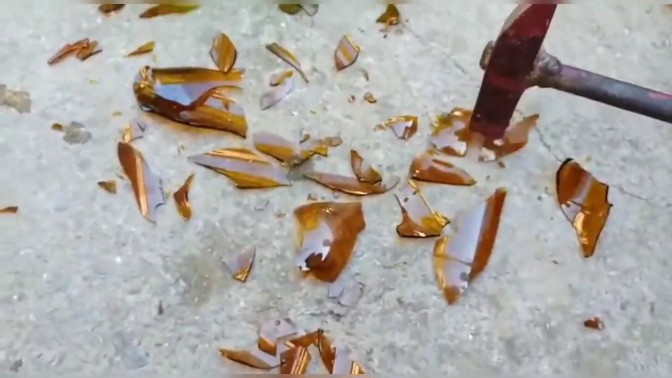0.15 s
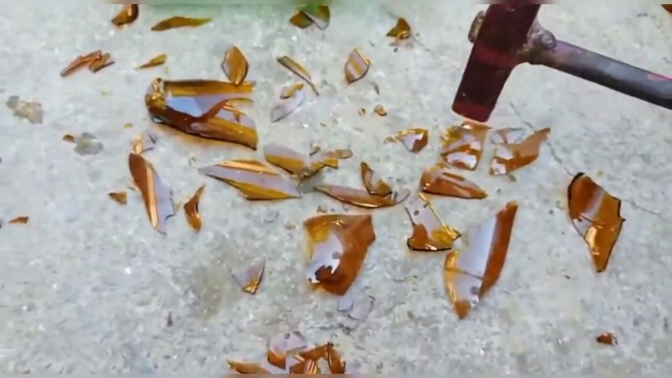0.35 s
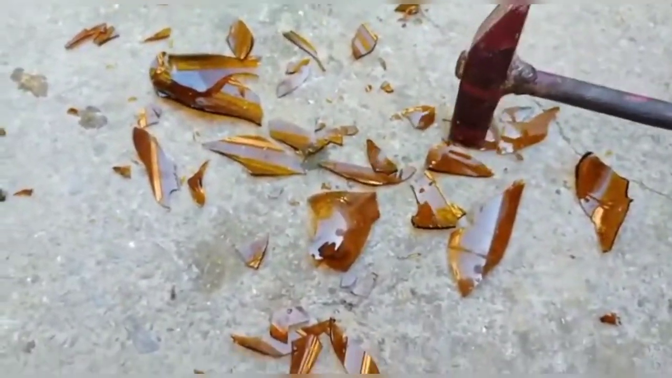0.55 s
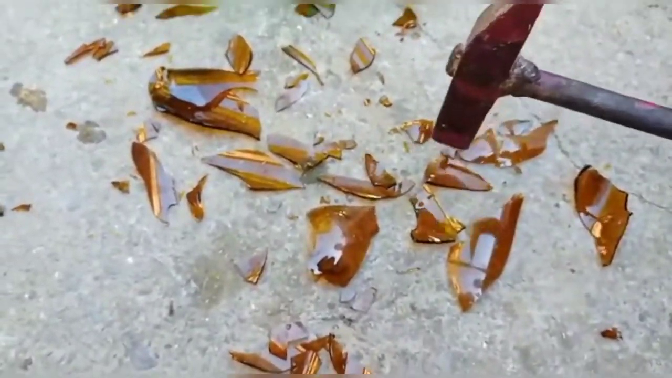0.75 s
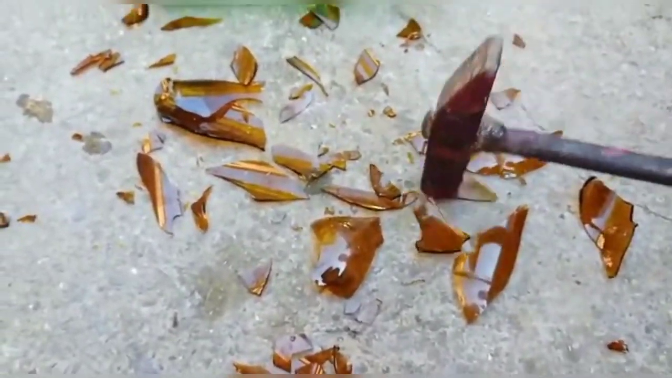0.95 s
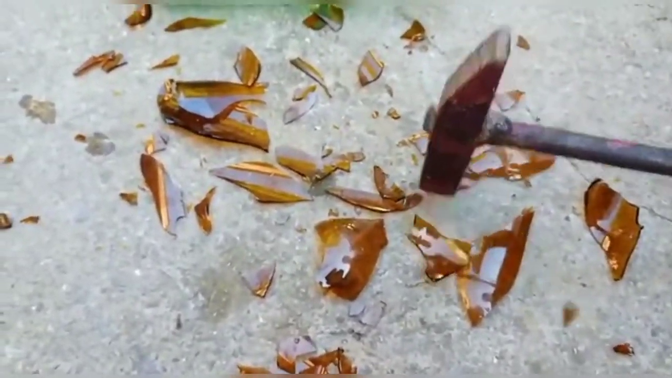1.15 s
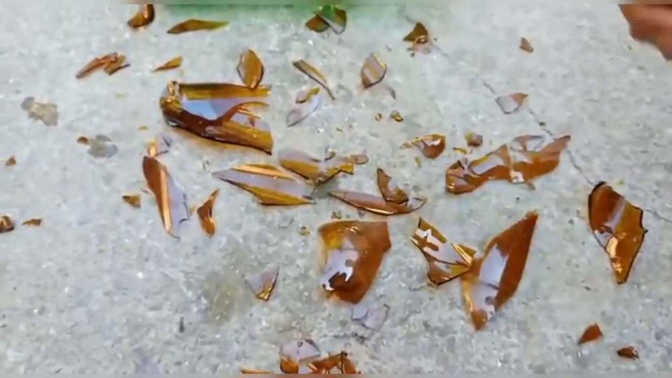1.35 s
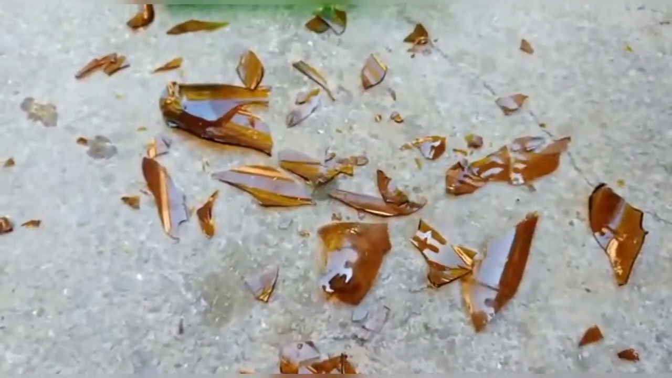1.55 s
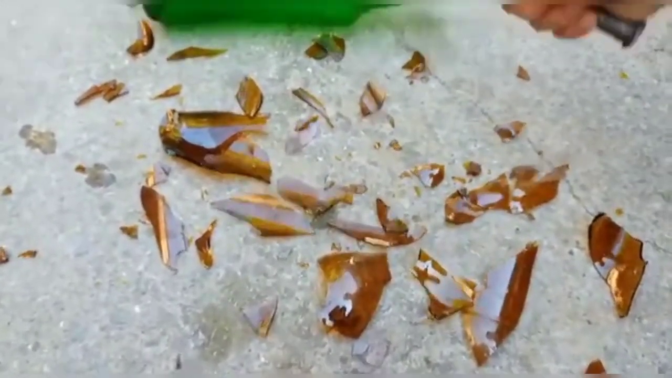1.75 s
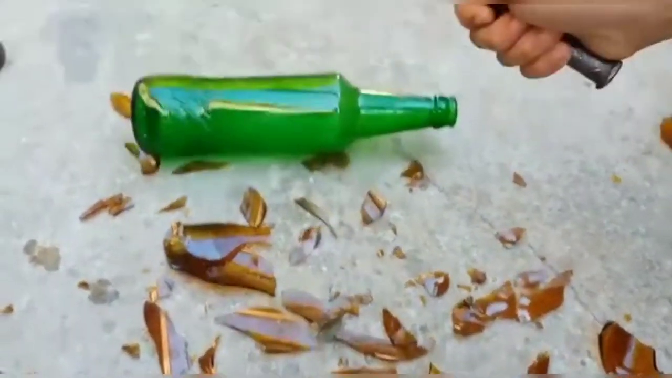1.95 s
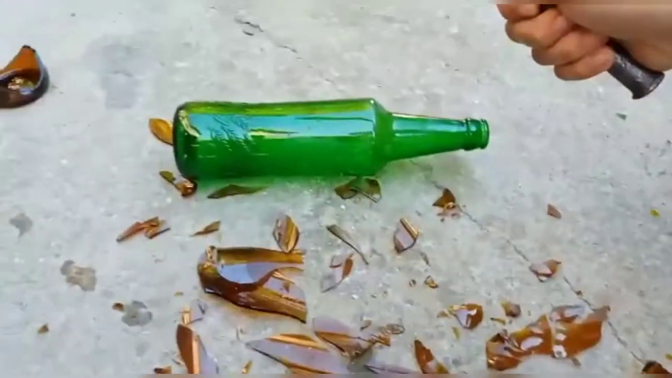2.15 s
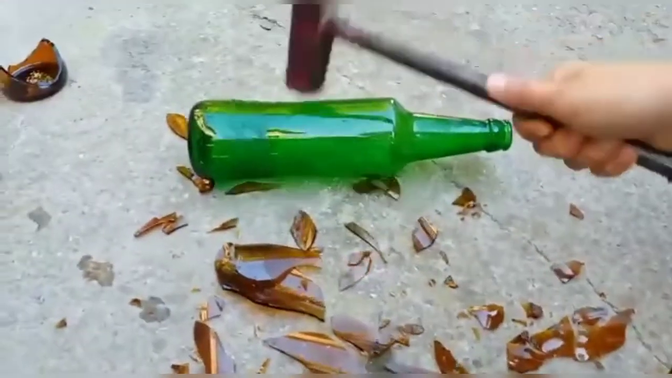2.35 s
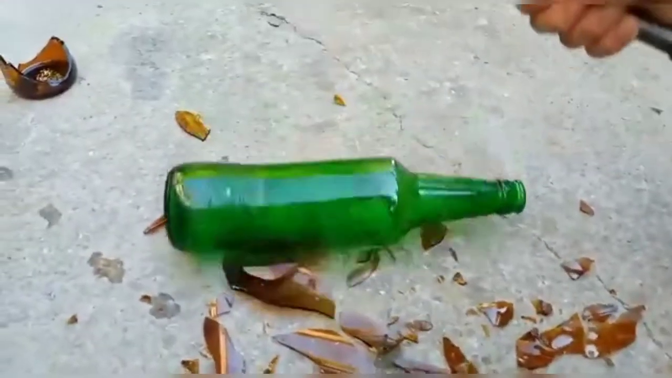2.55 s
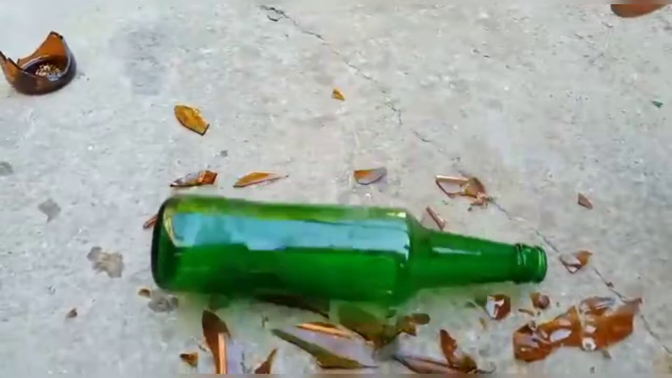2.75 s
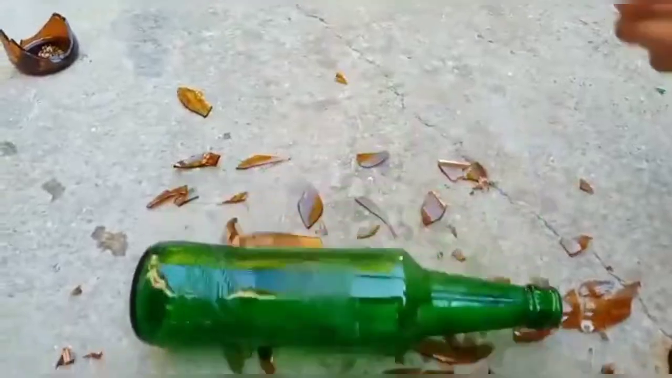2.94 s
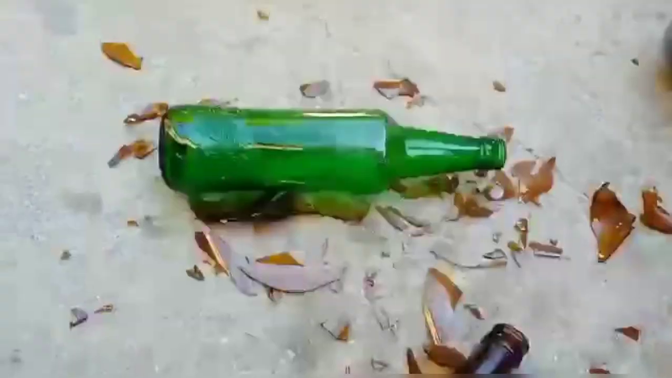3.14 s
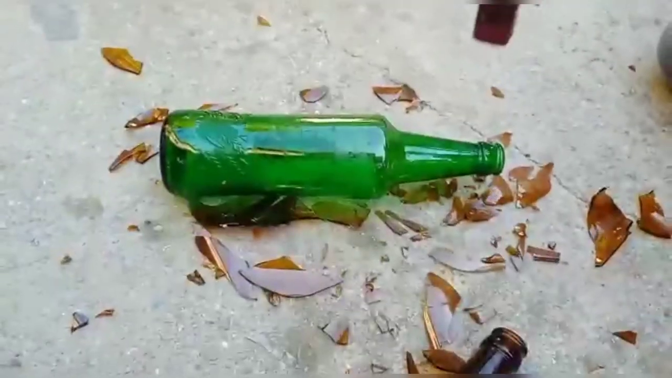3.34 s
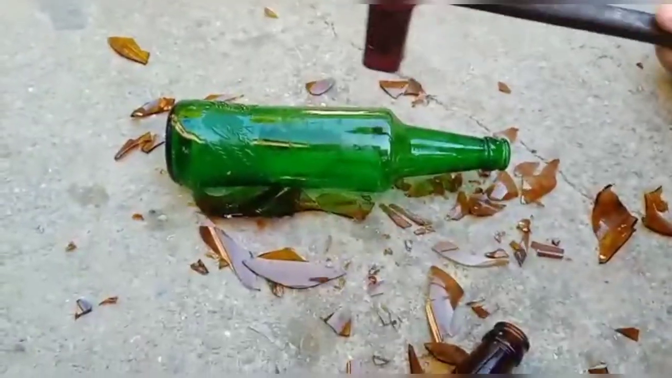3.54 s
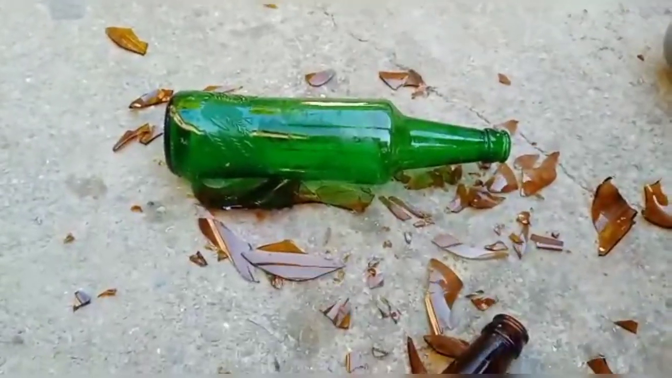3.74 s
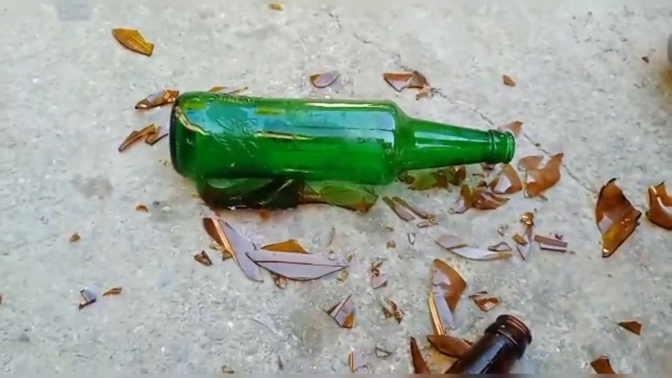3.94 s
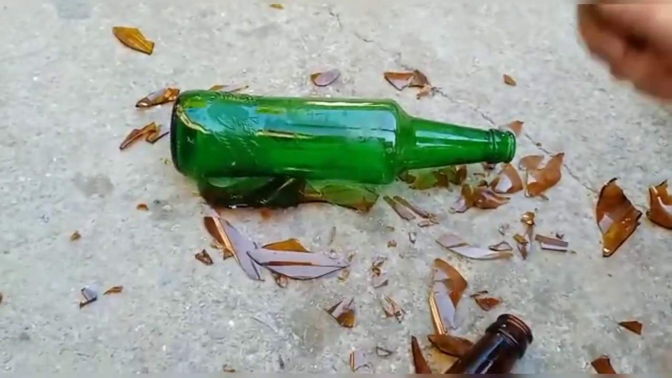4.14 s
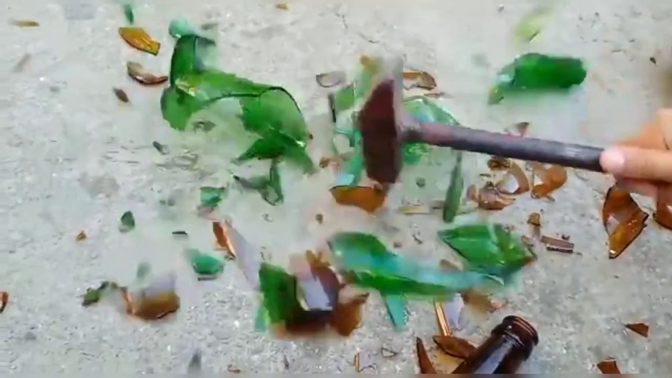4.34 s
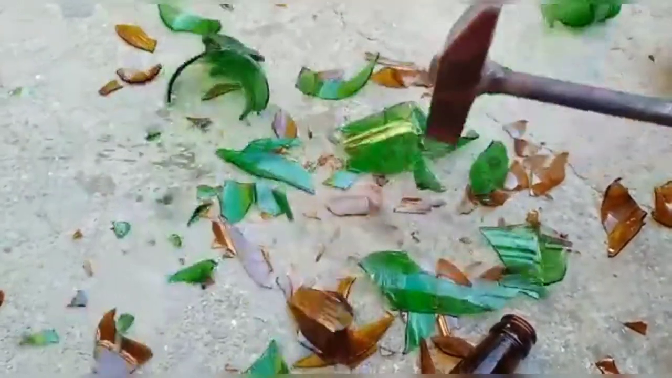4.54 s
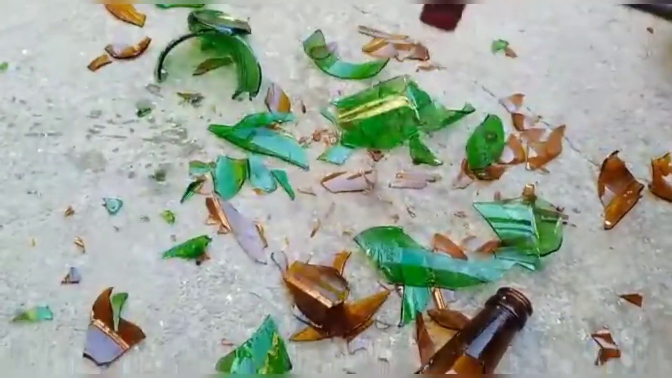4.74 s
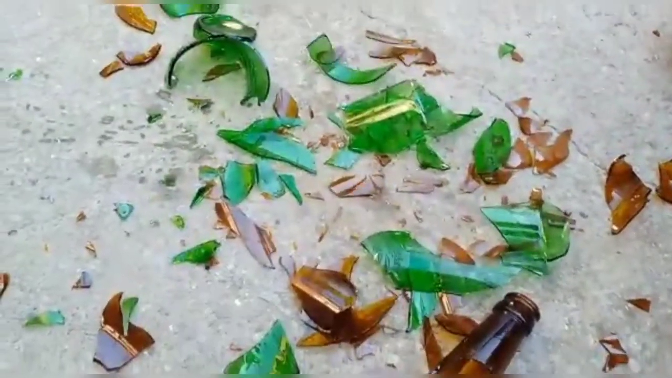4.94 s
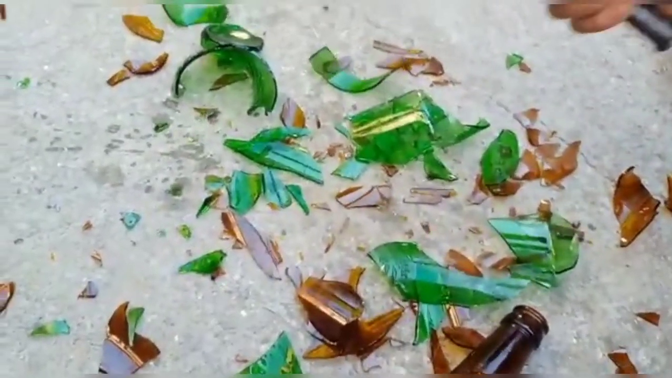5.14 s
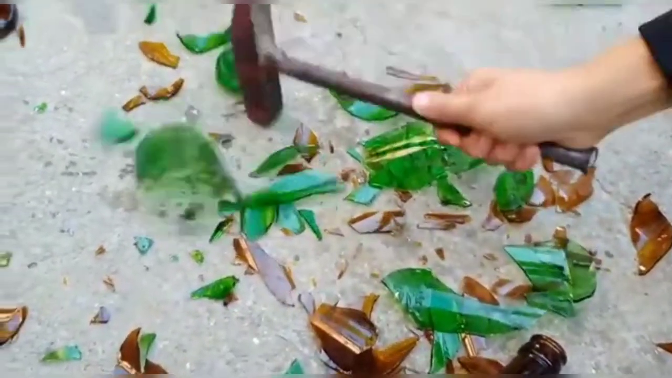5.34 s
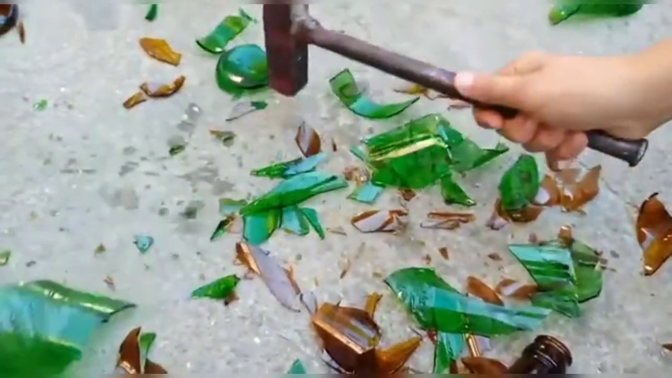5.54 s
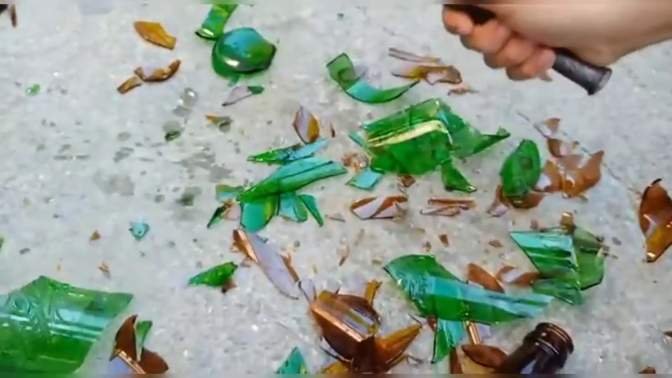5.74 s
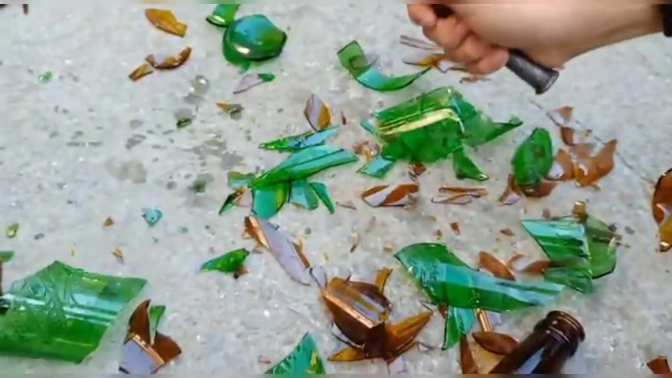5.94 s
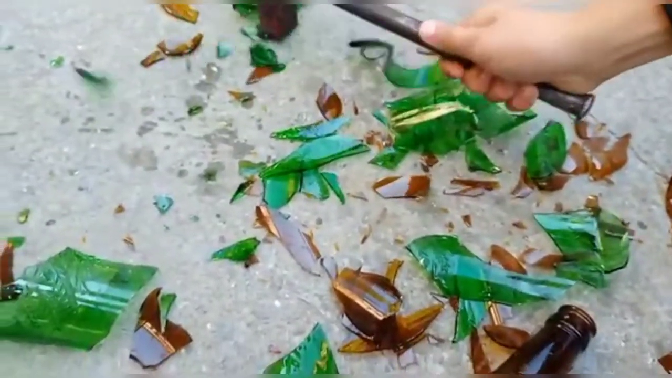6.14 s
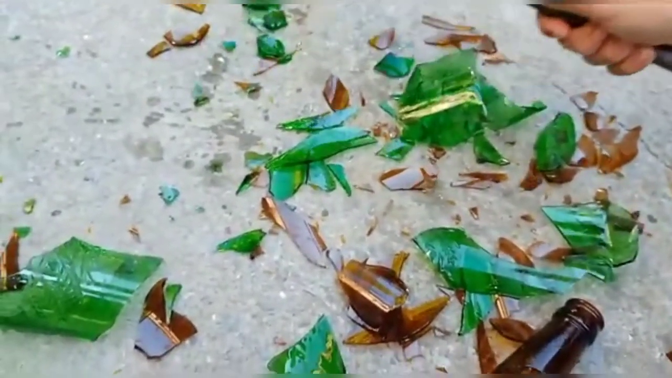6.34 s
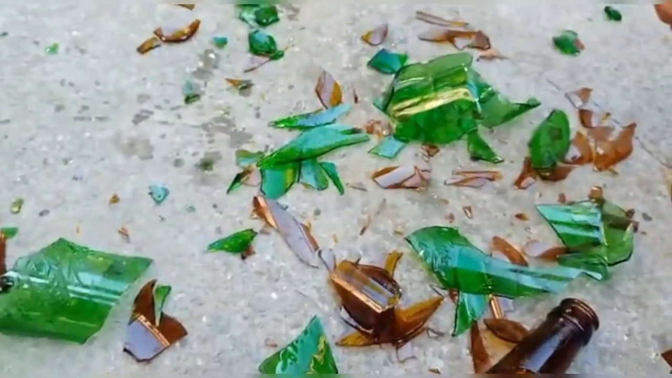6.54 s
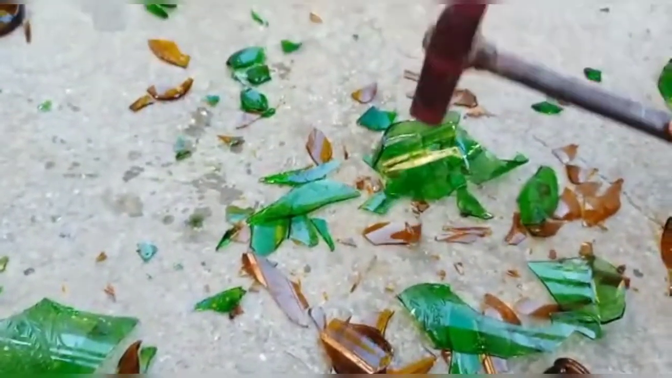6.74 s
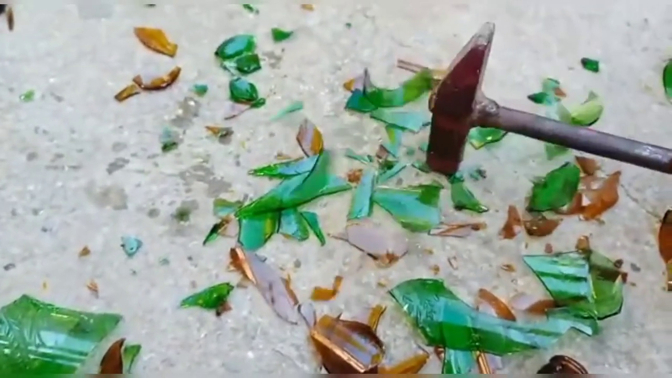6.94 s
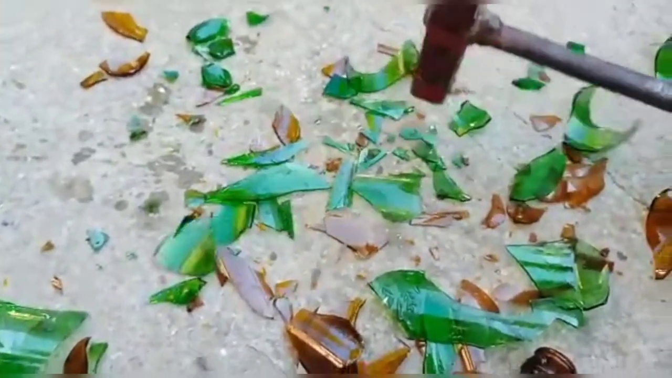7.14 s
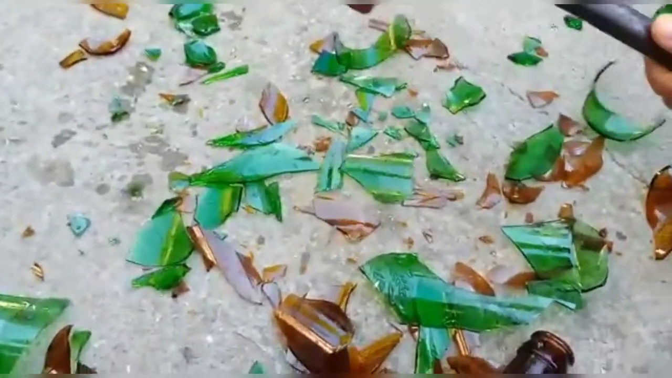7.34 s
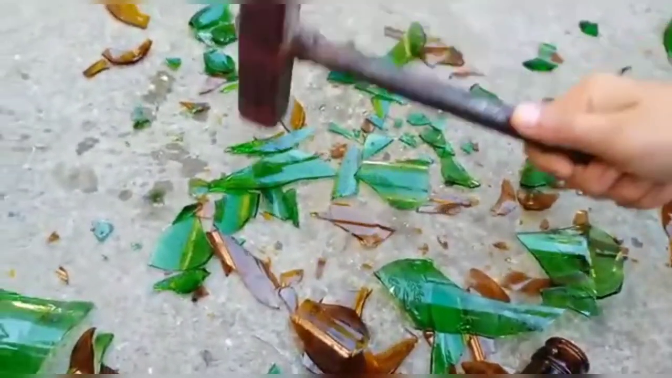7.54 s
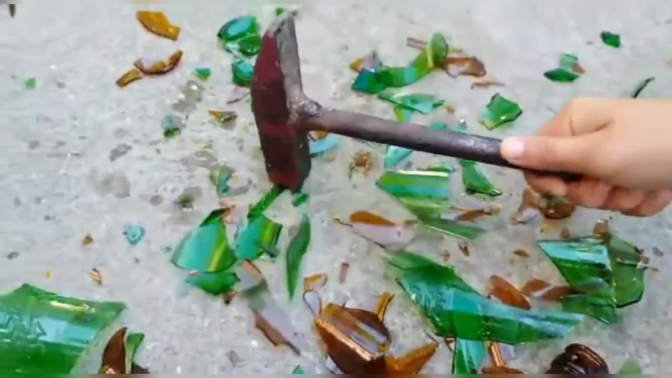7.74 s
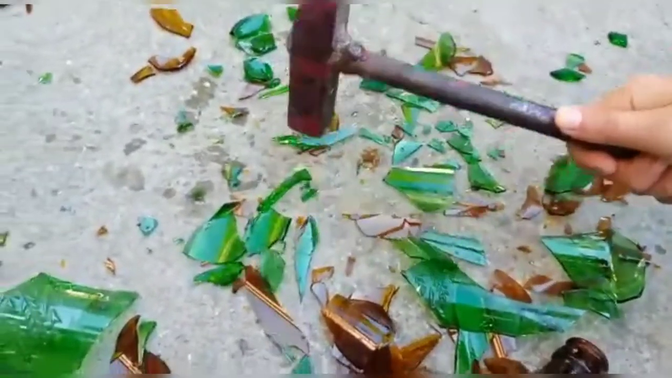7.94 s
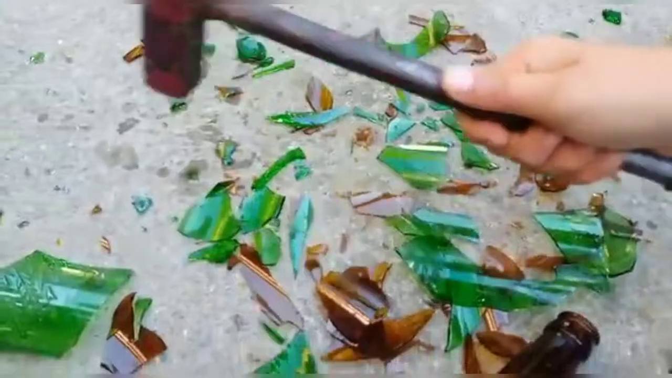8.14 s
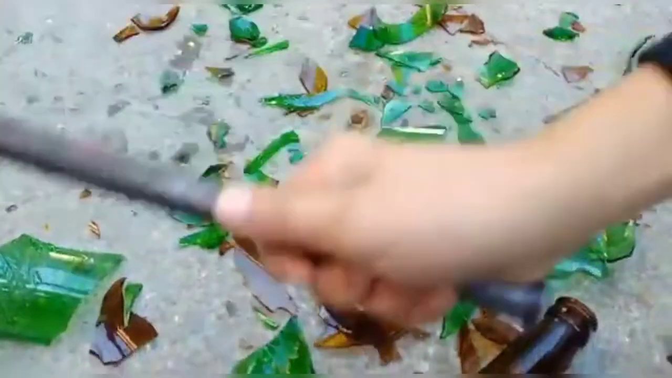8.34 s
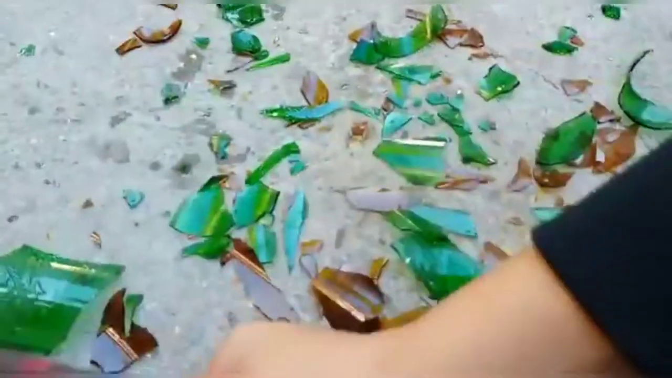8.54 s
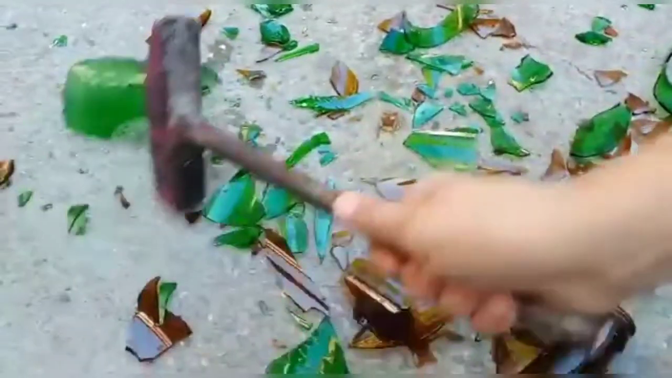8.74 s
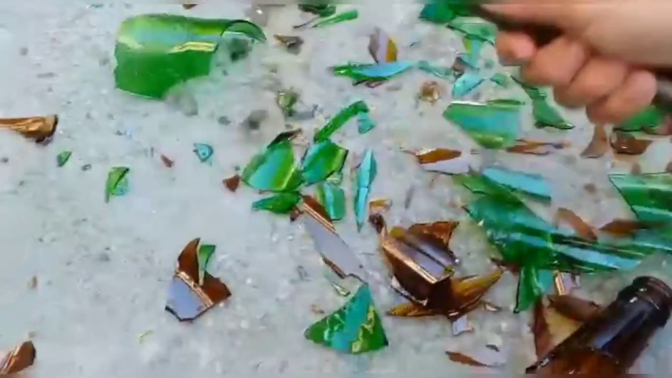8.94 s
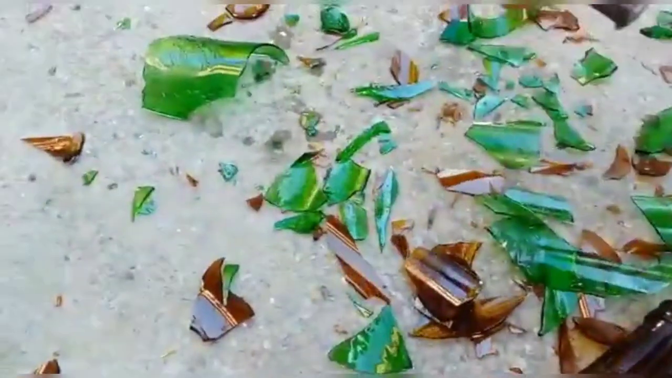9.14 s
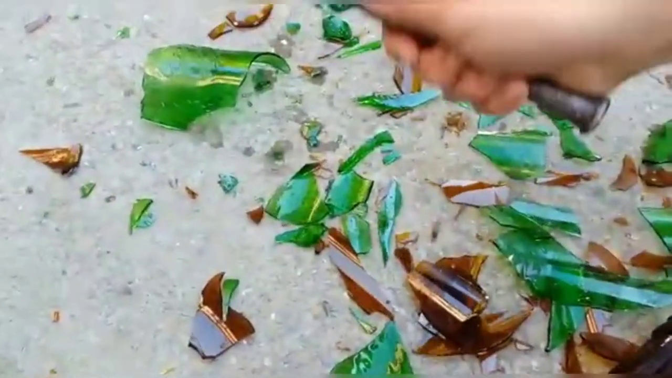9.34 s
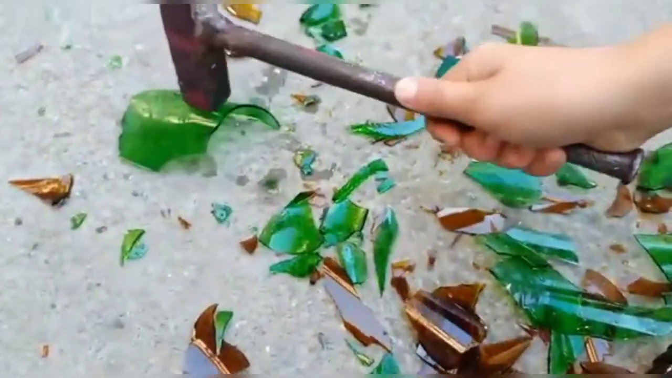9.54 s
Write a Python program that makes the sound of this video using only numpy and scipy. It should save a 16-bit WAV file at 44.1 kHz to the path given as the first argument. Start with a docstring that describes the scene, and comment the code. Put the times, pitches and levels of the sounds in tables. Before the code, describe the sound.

Very close, dry outdoor sound, distorted on the loudest hits, with quiet air beneath. Sharp hammer cracks with slab thuds land at 0.1, 0.6 and 1.1 s; the last throws chips that ping until 1.4. At 1.86 a whole bottle clanks loudly, rings long with a faint low hum, and rocks in quickening knocks. Harder glassy clatter runs from 2.4 to 3.1, then cuts abruptly to near silence. A soft rush and thin faint whine swell and fade around 3.4, with a tiny tap at 3.8. At 4.29 the bottle smashes in a longer crunch, shards bouncing, grinding and tinkling to 5. Further blows at 5.36, 6.1, 6.85, 7.66, 8.65 and 9.48 each crack sharply, scattering bright rings, clicks, gritty skids and fine glass hiss that settle into quiet within about half a second.

```python
"""Bottle glass breaks under hammer blows on concrete, so close that the microphone overloads; quiet outdoor air beneath.
Blows are shaped noise bursts over a damped slab thud. Loose pieces bounce, skid and ring at their own modes.
A whole bottle rings, hums and rocks to rest before it is smashed: damped modes, a cavity tone, quickening knocks.
One cut to near silence joins two shots; a soft rush and a faint whine swell just after it."""
import sys
import numpy as np
from scipy import signal
from scipy.fft import rfft, irfft, next_fast_len
from scipy.io import wavfile
from scipy.ndimage import uniform_filter1d, minimum_filter1d, map_coordinates

SR = 44100
rng = np.random.default_rng(int(sys.argv[2]) if len(sys.argv) > 2 else 0)


def to_wav(s):
    """Save 16-bit WAV."""
    ch = np.atleast_2d(s).T  # columns
    pcm = np.round(np.clip(ch, -1, 1) * 32767)  # PCM
    wavfile.write(sys.argv[1], SR, pcm.astype(np.int16))


N = 422478
SECOND_SHOT = 3.12  # s; no glass rings on across the cut

# hammer blows and heavy landings: (time [s], level [dB], crunch length [s], treble [dB re level], thud [dB re level])
BLOWS = [(0.072, -3, 0.0017, -5.5, 2.5), (0.076, -5, 0.014, -8.5, -6.5), (0.581, -3, 0.011, -18, 6.5),
         (1.084, -2, 0.011, -21, -3.5), (1.11, -19, 0.0033, -3.5, 19), (1.859, 2.5, 0.023, -16, -35.5),
         (2.44, 1.5, 0.026, -21, -37), (2.66, -1, 0.016, -22.5, -21), (2.686, -8.5, 0.0065, -15.5, -23),
         (2.727, -20, 0.013, -1, -23.5), (2.845, -18, 0.0092, 13, -21), (3.024, -7, 0.013, -18, -24.5),
         (3.078, -4.5, 0.0022, 1, -11), (3.191, -21, 0.0016, -30, -1.5), (3.833, -24.5, 0.0039, -16, 1.5),
         (4.287, 0, 0.14, -15.5, -20), (4.407, -9.5, 0.053, -12.5, -16), (4.472, -9, .016, -19, 13.5),
         (5.362, 1, 0.0031, -14, -28), (5.368, 0, 0.036, -12, -28.5), (5.495, -11.5, 0.017, -18, -16.5),
         (6.11, 1, 0.0071, -8.5, 0), (6.254, -28, 0.0093, 21, 6), (6.844, 0.5, 0.05, -13, -22),
         (6.901, -9, 0.01, -8, -16), (7.046, -5.5, 0.0051, -15.5, -2), (7.076, -5.5, 0.03, -21.5, -13),
         (7.661, 1, 0.014, -25, 1.5), (7.849, -2.5, 0.005, -25.5, -9.5), (8.325, -29.5, 0.0077, -22, -20),
         (8.645, 6.5, 0.0089, -16.5, -11.5), (8.667, -12, 0.04, -2.5, -21.5),
         (8.727, -10.5, 0.015, -13.5, -4), (9.475, -4, .018, -6.5, -15), (9.519, -5.5, 0.0066, -4.5, -15)]
# pieces striking the floor or each other: (time [s], level [dB], favoured pitch [Hz])
CLINKS = [(0.056, -23, 3050), (.0714, -6.5, 3270), (.171, -12, 7040), (0.2226, -21, 5500),
          (0.2528, -8.5, 7840), (0.5844, -4.5, 13800), (1.0731, -6.5, 13340), (1.0859, -3.5, 2550),
          (1.114, -10, 3820), (1.1664, -3, 5770), (1.243, -7, 5600), (1.2912, -11.5, 14500),
          (1.328, -16, 4400), (1.3592, -14.5, 7260), (1.858, 7, 2900), (2.0945, -18, 4900),
          (2.4444, 6.5, 4450), (2.579, -0.5, 4800), (2.6523, -6.5, 5050), (2.731, -3, 6600),
          (2.7962, -19, 4790), (2.8458, -3.5, 2180), (2.9026, -11, 4300), (2.9333, -1.5, 2340),
          (2.974, -0.5, 3540), (2.987, -3.5, 5200), (3.0153, -16.5, 4370), (3.026, -7, 7404),
          (3.0727, -4, 4520), (4.286, -4, 1800), (4.486, -10, 2750), (4.535, -5, 4030),
          (4.6068, -8.5, 7880), (4.643, -12.5, 6000), (4.686, -11, 4500), (4.8524, -5, 7660),
          (4.896, -8.5, 4830), (4.9866, -25, 7400), (5.3023, -20.5, 3350), (5.3648, -2.5, 3100),
          (5.435, -11, 3840), (5.458, -7.5, 2716), (5.4994, -3, 3420), (5.5869, -12, 6500),
          (5.636, -12.5, 6500), (5.67, -2, 7700), (5.7878, -3, 2395), (5.8348, -12.5, 2080),
          (5.9019, -7, 5920), (6.1078, -4.5, 2400), (6.16, -18, 4760), (6.1979, -20.5, 7960),
          (6.2535, -5, 4600), (6.3008, -17.5, 7600), (6.331, -19, 5430), (6.3872, -21.5, 6640),
          (6.4256, -24, 11800), (6.4649, -13.5, 8000), (6.5037, -19.5, 8760), (6.56, -13.5, 10800),
          (6.843, -2.5, 2130), (6.9566, -10.5, 8240), (6.9893, -16, 9900), (7.0115, -17.5, 11100),
          (7.045, -3.5, 7560), (7.0809, 1, 2940), (7.229, -5.5, 7750), (7.272, -4, 5150),
          (7.3886, -12, 11450), (7.7338, -18.5, 3960), (7.782, 1.5, 6300), (7.796, 1.5, 5090),
          (7.851, -8, 10900), (7.9154, -21.5, 8200), (7.9698, -13, 9050), (8.1585, -25.5, 8240),
          (8.1904, -32, 8220), (8.2341, -30, 12230), (8.645, 2, 6060), (8.7047, -5, 4470), (8.73, -2, 2800),
          (8.7893, -2, 2980), (8.829, -11, 3700), (8.9257, -4, 3000), (8.994, -12.5, 2060),
          (9.5175, -6.5, 5980)]
# modes of each piece that moves: (frequency [Hz], level [dB])
CHIP = [(7620, 6.5)]
SLIVER = [(8000, 7.6), (13730, 12)]
CURL = [(5490, -13.5), (6450, -10), (8600, -10), (9790, -17), (13340, -5.5)]
BOTTLE = [(2366, -2), (3289, 2.5), (3338, -2.5), (4762, 2.5), (4900, -2.5), (5160, -5.5), (6350, 2.5),
          (7110, 1), (7496, 0), (7950, -8), (10000, -24.5), (11700, -18), (13500, -12.5)]
HEAP = [(2700, -20.5), (4572, -13), (5419, -13.5), (5866, -8), (6499, -15), (7790, -2.5), (9190, -16.5),
        (9700, -17), (11060, -13.5), (11750, -12)]
WALL = [(1058, -11), (1937, 4.5), (2282, -4), (3845, -2.5), (4776, 5), (6497, 6.5), (7188, 3), (8670, -5.5),
        (9700, -12.5), (11000, -8.5), (12800, -13)]
BASE = [(2600, 4), (3012, 4.5), (4600, -8), (5056, 2.5), (5259, -6.5), (6300, 10), (7785, 9), (11200, 4),
        (11800, -16)]
LABEL = [(1490, -9.5), (2985, -2), (3350, -12.5), (4186, -25), (5251, -3.5), (6245, -3), (6721, -1),
         (7365, -6), (8140, -4.5), (10430, -4), (11100, 3.5)]
SPLINTERS = [(3400, -8), (3850, -17.5), (5003, -24.5), (6850, 1.5), (7372, -1.5), (8115, 5), (10576, -1.5),
             (11500, 2), (14200, 2)]
# which piece moves when: (start [s], its modes)
MOVING = [(0, CHIP), (0.43, SLIVER), (0.79, CURL), (1.4, BOTTLE), (SECOND_SHOT, []), (3.4, HEAP),
          (5.15, BASE), (5.35, WALL), (5.89, HEAP), (6.05, BASE), (6.8, LABEL), (7.6, SPLINTERS),
          (8.6, WALL)]
# spectrum of knocks and grinding on concrete: (frequency [Hz], relative level [dB])
GRIT = [(60, -21.5), (200, 1.5), (800, -4), (2200, -1.5), (5000, -11), (16000, -32)]
# spectrum of bright contact clicks: (frequency [Hz], relative level [dB])
TICK = [(300, -49), (2000, -9), (5000, 8), (10000, 0), (16000, -7.5)]


def amp(db):
    """Amplitude ratio from dB."""
    return 10 ** (np.asarray(db) / 20)


def unit(x):
    """x scaled to rms 1."""
    return x / np.sqrt(np.mean(x ** 2) + 1e-20)


def curves(rows):
    """One value per sample for each column after the time."""
    s, *cols = np.transpose(rows)
    return [np.interp(np.arange(N) / SR, s, c) for c in cols]


def filtered(x, response):
    """x times a response of frequency."""
    m = next_fast_len(N + 8192)
    return irfft(rfft(x, m) * response(np.fft.rfftfreq(m, 1 / SR)), m)[..., :N]


def noise(points):
    """Noise of rms 1 coloured by (frequency [Hz], level [dB]) points on a log axis."""
    f, db = np.transpose(points)
    white = rng.standard_normal(N)
    return unit(filtered(white, lambda hz: amp(np.interp(np.log(hz + 1), np.log(f), db))))


def wobble(knots_per_s):
    """A smooth random curve through random knots."""
    knots = rng.standard_normal(int(N / SR * 1000) + 4)
    return map_coordinates(knots, [np.arange(N) * knots_per_s / SR])


def ring(x, hz, width_hz):
    """A damped mode: an impulse of 1 rings with amplitude about 1."""
    r = np.exp(-np.pi * width_hz / SR)
    w = 2 * np.pi * hz / SR
    return signal.lfilter([0, np.sin(w)], [1, -2 * r * np.cos(w), r * r], x)


def kicks(s, gain):
    """Impulses of the given gains at the given times."""
    return np.bincount(np.clip(np.round(s * SR).astype(int), 0, N - 1), gain, N)


def fall(x, seconds):
    """Each impulse dies away exponentially with this time constant."""
    return signal.lfilter([1], [1, -np.exp(-1 / (seconds * SR))], x)


def width(hz):
    """Base width in Hz of a mode: higher modes are wider and die sooner."""
    return 14 + 2.8 * hz / 1000


def skitter():
    """Tinkle, grit and dust level in dB: each scatter of small bits rises, sags while it lasts, then settles."""
    # bits set moving by each jolt: (time [s], tinkle [dB], grit [dB], dust [dB], duration [s],
    # tinkle and dust sag [dB/s], grit sag [dB/s])
    scatters = [(0.073, -56, -57.5, -34, 0.165, 25, 17), (0.585, -63, -41.5, -40, 0.11, 6, 114),
                (1.075, -28.5, -56.5, -32, 0.23, 19, 42.5), (1.408, -55, -44.5, -48, 0.64, 46.5, 53),
                (1.841, -22, -34.5, -41, 0.28, 48.5, -15.5), (2.435, -19, -20, -27, 0.29, 8, 45),
                (2.628, -15, -23, -25, 0.21, 103.5, 182), (2.828, -15.5, -38.5, -31.5, 0.069, 0, 6.5),
                (2.917, -13.5, -24.5, -29.5, 0.22, 28, 31.5), (4.28, -17, -25, -21.5, 0.13, -19, -58),
                (4.458, -13.5, -8, -15, 0.13, 58.5, 66.5), (4.584, -21.5, -33, -36.5, 0.36, 8.5, 34.5),
                (5.147, -50, -45, -61.5, 0.18, 38, -22), (5.362, -15, -11, -20.5, .34, 43, 105.5),
                (5.772, -36, -45.5, -44.5, 0.25, 81, 15), (6.103, -29, -30.5, -33, 0.25, 2, 33),
                (6.316, -29.5, -40.5, -33, .25, 45.5, 34), (6.834, -22, -18.5, -29.5, 0.57, 22.5, 63),
                (7.218, -20.5, -34.5, -39, 0.22, 69.5, 90), (7.655, -22.5, -33, -38, 0.093, 4, 22.5),
                (7.784, -15, -26.5, -32.5, 0.168, 95.5, 167.5), (8.64, -14.5, -20, -33, 0.18, 17, 41.5),
                (9.478, -18.5, -20.5, -20.5, 0.069, 207.5, 222)]
    rise_s, settle_db_per_s, still_db = 0.0047, 278, -85
    t = np.arange(0, N / SR + 1 / 400, 1 / 400)
    s, tinkle_db, grit_db, dust_db, lasts_s, sag, grit_sag = np.transpose(scatters)[:, :, None]
    age_s = np.maximum(t - s, 0)
    settling = amp(-settle_db_per_s * np.maximum(age_s - lasts_s, 0))
    shape = np.clip(age_s / rise_s, 0, 1) * settling
    levels_db = []
    for db, slope in ((tinkle_db, sag), (grit_db, grit_sag), (dust_db, sag)):
        power = np.sum((shape * amp(db - slope * np.minimum(age_s, lasts_s))) ** 2, axis=0)
        levels_db.append(10 * np.log10(power + amp(still_db) ** 2))
    return curves(np.transpose([t] + levels_db))


def patter(count):
    """Random light contacts that follow the tinkle level: times in s and levels in dB."""
    when, size = rng.random((count, 2)).T
    s = when * (N - 1) / SR
    return s, skitter()[0][(s * SR).astype(int)] - 3 * np.log(size + .015)


def air(loud):
    """Outdoor hush as coloured noise; it dips just before and during each loud burst."""
    # spectrum of the air: (frequency [Hz], relative level [dB])
    air_colour = [(18, -58.5), (30, -18), (53, -5), (127, -7.5), (233, -9), (844, -15.5), (3580, -17.5),
                  (7400, -21), (9000, -30), (16000, -38)]
    ahead = -minimum_filter1d(-abs(loud), size=1101, origin=-550)  # peak over the next 25 ms
    dip = uniform_filter1d(0.13 + 0.5 / (1 + (ahead / .5) ** 2), size=200)
    return dip * amp(-44 + 0.68 * wobble(2.295)) * noise(air_colour)


def whine():
    """Faint, far, thin sines swell after the cut, droop in pitch ever faster and vanish."""
    # tones: (frequency [Hz], level [dB])
    tones = [(797, -42), (1596, -41), (3995, -48)]
    loudest_s, rise_db_per_s, fall_db_per_s = 3.385, 70, 180
    droop_per_s3 = 1.1
    t = np.arange(N) / SR
    age_s = np.clip(t - SECOND_SHOT, 0, 1)
    turns = np.cumsum(1 - droop_per_s3 * age_s ** 3 + .002 * wobble(30)) / SR  # per Hz of pitch
    waver_db = 4 * wobble(25)
    slope_db = np.minimum(rise_db_per_s * (t - loudest_s), -fall_db_per_s * (t - loudest_s))
    swell_db = slope_db + waver_db
    return (age_s > 0) * sum(amp(db + swell_db) * np.sin(2 * np.pi * hz * turns) for hz, db in tones)


def rush():
    """A soft mid-pitched noise rises, holds and fades once."""
    # spectrum: (frequency [Hz], relative level [dB])
    rush_colour = [(300, -13.5), (750, 4.5), (1300, -12), (2500, -4), (4500, -15.5), (7000, -9.5),
                   (10000, -27.5)]
    full_s, hold_s, level_db = 3.364, .17, -38
    rise_db_per_s, fall_db_per_s = 114, 65.5
    t = np.arange(N) / SR - full_s
    slope_db = np.minimum(rise_db_per_s * t, -fall_db_per_s * (t - hold_s))
    return amp(level_db + np.minimum(slope_db, 0)) * noise(rush_colour)


def ticks():
    """Crumbs too small to ring land with a dry click: bright noise under a very short decay."""
    # landings: (time [s], level [dB])
    landings = [(0.6809, -25), (0.7119, -28), (1.4194, -28.5), (1.555, -27), (1.5776, -23.5), (4.7076, -4),
                (5.0609, -25.5), (5.0875, -29.5), (6.7047, -4), (6.7507, -21), (6.7683, -19), (6.8101, -20),
                (8.0709, -18), (8.097, -18), (9.033, -22.5)]
    s, db = np.transpose(landings)
    return fall(kicks(s, amp(db)), seconds=0.00053) * noise(TICK)


def crumbs():
    """Tiny bits, each with a pitch of its own, ping once; the finest land in short puffs of hiss."""
    s, db = patter(count=900)
    pitch, life = rng.random((len(s), 2)).T[:, :, None]
    t = np.arange(2048) / SR
    hz = 3000 * 5.2 ** pitch
    fade_60db_s = 0.012 + 0.041 * life ** 2
    pings = amp(db[:, None] - 4 * pitch - 60 * t / fade_60db_s) * np.sin(2 * np.pi * hz * t)
    where = (s * SR).astype(int)[:, None] + np.arange(len(t))
    when, size = rng.random((2, 2, 300))
    coarse, fine = [.5 + unit(fall(kicks(w * N / SR, z ** 2), seconds=.008)) for w, z in zip(when, size)]
    coarse_hiss = coarse * noise([(1500, -33), (2600, -2.5), (4500, -4), (7000, -22)])
    fine_hiss = 0.99 * fine * noise([(3500, -26), (7500, 0.5), (16000, -13.5)])
    dust = amp(skitter()[2]) * (coarse_hiss + fine_hiss)
    return np.bincount(where.ravel(), pings.ravel(), N + len(t))[:N] + dust


def scraping():
    """Heavier pieces knock dully on the concrete and grind over grit, grain by grain over a blurred wash."""
    s, db, hz = np.transpose(CLINKS)
    knock_db = -14.5 - 4.5 * np.log2(hz / 2000)  # smaller, higher pieces knock less
    knocks = fall(kicks(s, amp(db + knock_db)), seconds=0.0017)
    when, size = rng.random((1100, 2)).T
    grains = fall(kicks(when * N / SR, amp(-6.5 - 5.2 * np.log(size + 0.0081))), seconds=0.0043)
    wash = amp(-10 + 1.2 * wobble(150) + 1.9 * wobble(27))
    return (knocks + amp(skitter()[1]) * (grains + wash)) * noise(GRIT)


def rocking(count):
    """The shoved bottle knocks on the slab ever faster and softer until it lies still."""
    first_s, first_gap_s, gap_ratio = 1.9575, .038, .69
    first_db, loss_db = -12.5, 1.5  # loss at each contact
    k = np.arange(count)
    s = first_s + first_gap_s * (1 - gap_ratio ** k) / (1 - gap_ratio)
    return fall(kicks(s, amp(first_db - loss_db * k)), seconds=.0016) * noise(GRIT)


def cavity():
    """Air in the neck and belly of the jolted whole bottle hums like a blown jug: one narrow low mode."""
    # jolts: (time [s], level [dB])
    jolts = [(1.859, -25), (2.437, -32), (2.741, -35.5), (2.849, -44.5)]
    s, db = np.transpose(jolts)
    hum = ring(kicks(s, amp(db)), hz=156, width_hz=1.8)
    return hum * (np.arange(N) / SR < SECOND_SHOT)


def rattle():
    """While a piece skids, light random contacts keep some of its modes singing."""
    s, db = patter(count=1300)
    out = np.zeros(N)
    ends = [row[0] for row in MOVING[1:]] + [N / SR]
    for (start, modes), end in zip(MOVING, ends):
        now = (s >= start) & (s < end)
        part = slice(round(start * SR), round(end * SR))
        for mode_hz, mode_db in modes:
            scatter = rng.standard_normal((len(s), 2))
            # each mode has its own busy moments
            stirring_db = 6.3 * np.sin(2 * np.pi * (rng.random() + rng.uniform(2, 6.5) * s))
            level_db = db - 10.5 + 0.81 * mode_db + 6.28 * scatter[:, 0] + stirring_db
            drive = kicks(s, now * amp(level_db) * np.sign(scatter[:, 1]))
            out[part] += ring(drive[part], mode_hz, 0.83 * width(mode_hz))
    return out + fall(kicks(s, amp(db - 12.5)), seconds=0.00046) * noise(TICK)


def rings():
    """Each airborne piece sings one mode, wavering as it spins, and is all but stopped by the floor."""
    # flights: (time [s], frequency [Hz], level [dB], flight [s])
    flights = [(1.165, 5489, -18, 0.094), (1.167, 13340, -12.5, 0.015), (1.172, 9800, -27, 0.023),
               (1.874, 2370, -18, .28), (2.442, 4760, -16.5, 0.12), (2.462, 3355, -11, 0.1),
               (2.466, 2365, -9.5, 0.093), (2.843, 2387, -20.5, 0.12), (2.934, 7070, -14, 0.054),
               (2.954, 3320, -12.5, 0.028), (3.009, 7500, -10, 0.026), (4.53, 9700, -19.5, 0.041),
               (4.563, 6470, -20, 0.064), (4.582, 7830, -20.5, 0.1), (4.887, 3000, -29, 0.034),
               (4.643, 5820, -22.5, 0.069), (4.643, 9270, -25, 0.066), (4.66, 4573, -12.5, 0.046),
               (4.787, 4570, -28, 0.043), (4.798, 5850, -31, 0.049), (4.848, 7811, -12.5, 0.018),
               (4.897, 4600, -20.5, 0.024), (4.918, 6280, -22.5, 0.02), (4.931, 5419, -33, 0.079),
               (5.38, 6500, -17.5, 0.046), (5.44, 7190, -11.5, 0.077), (5.465, 1905, -25, 0.23),
               (5.503, 6500, -30.5, 0.23), (5.53, 2285, -33, 0.2), (5.591, 3840, -44, 0.128),
               (5.666, 4800, -30, 0.052), (5.903, 5880, -12, 0.016), (5.902, 9280, -19, 0.0077),
               (6.161, 5030, -24, 0.059), (6.167, 7740, -25, 0.036), (6.285, 7800, -29, 0.074),
               (6.306, 5280, -23.5, 0.083), (6.565, 11200, -30, 0.023), (6.892, 8260, -21, 0.061),
               (6.896, 6200, -23.5, 0.066), (6.932, 3350, -33.5, .11), (6.974, 4240, -32, 0.055),
               (6.989, 10500, -20, 0.03), (7.045, 6794, -15.5, 0.13), (7.155, 3390, -30.5, 0.049),
               (7.158, 2990, -28, 0.034), (7.179, 5270, -27.5, 0.13), (7.224, 10430, -19.5, 0.054),
               (7.225, 11040, -23.5, 0.087), (7.236, 6770, -15.5, 0.054), (7.271, 2988, -26.5, 0.079),
               (7.39, 3000, -42, 0.12), (7.666, 7340, -21.5, 0.16), (7.7, 6620, -21, 0.055),
               (7.793, 4980, -16, 0.035), (7.819, 10600, -20, 0.041), (7.852, 8180, -31, 0.1),
               (8.647, 6510, -17.5, 0.17), (8.705, 3880, -21.5, 0.12), (8.728, 7200, -10, 0.023),
               (8.73, 2270, -24.5, 0.12), (8.732, 1932, -14, 0.12), (8.79, 7200, -19, 0.036),
               (8.79, 8700, -32, 0.07), (8.809, 4760, -33.5, 0.16), (9.482, 6520, -15, 0.033)]
    rise_s, sing_db, free_db_per_s = 0.0015, 4.5, 48.5
    landed_db_per_s = 898.5  # steep loss on landing, until the slower one below takes over
    lying_db, lying_db_per_s = 18.5, 199
    out, t = np.zeros(N + SR), np.arange(SR // 2) / SR
    for s, hz, db, flight_s in flights:
        down_s = np.maximum(t - flight_s, 0)
        heard = (s > SECOND_SHOT) | (s + t < SECOND_SHOT)
        landing_db = np.minimum(landed_db_per_s * down_s, lying_db + lying_db_per_s * down_s)
        loss_db = free_db_per_s * (t - flight_s / 2) + landing_db
        phase, spin = rng.random(2)
        waver_db = 1.3 * np.sin(2 * np.pi * (phase + (15 + 25 * spin) * t))
        envelope = amp(db + sing_db - loss_db + waver_db) * (1 - np.exp(-t / rise_s))
        out[round(s * SR):][:len(t)] += heard * envelope * np.sin(2 * np.pi * hz * t)
    return out[:N]


def clinks():
    """A contact rings the moving piece near its favoured pitch, plus a loose bit at that pitch; all flutter."""
    out, t = np.zeros(N + SR), np.arange(SR // 6) / SR
    starts = [row[0] for row in MOVING]
    gaps_s = np.diff(np.transpose(CLINKS)[0], append=N / SR)
    for (s, db, hz), gap_s in zip(CLINKS, gaps_s):
        clear_of_blows = np.min(abs(s - np.transpose(BLOWS)[0])) > 1 / 150
        loose_db = -8 if clear_of_blows else -60  # the hammer pins loose bits down
        _, modes = MOVING[np.searchsorted(starts, s) - 1]
        mode_hz, mode_db = np.transpose(list(modes) + [(hz, loose_db)])[:, :, None]
        width_hz = 1.7 * width(mode_hz)  # the floor damps a piece that has just hit it
        width_hz[-1] = 75  # the loose bit only pings
        scatter = rng.standard_normal((20, 1))[:len(mode_hz)]
        level_db = db + 0.5 + 0.62 * mode_db - 21 * abs(np.log2(mode_hz / hz)) + 4.7 * scatter
        decay = np.exp(-np.pi * width_hz * t) * (1 - np.exp(-t / 0.0007))
        decay = decay * np.exp(-60 * np.maximum(t - gap_s, 0))  # the next contact damps the ring
        heard = (s > SECOND_SHOT) | (s + t < SECOND_SHOT)
        tones = amp(level_db) * decay * np.sin(2 * np.pi * mode_hz * t)
        out[round(s * SR):][:len(t)] += heard * np.sum(tones, axis=0)
    s, db = np.transpose(CLINKS)[:2]
    snap = fall(kicks(s, amp(db - 6.5)), seconds=0.00015) + fall(kicks(s, amp(db - 6.0)), seconds=0.00099)
    return out[:N] * amp(0.37 * wobble(92)) + snap * noise(TICK)


def whole_bottle():
    """Every mode of the uncracked bottle rings long and fades smoothly; close pairs beat."""
    # strikes: (time [s], level [dB], favoured pitch [Hz])
    strikes = [(1.87, 0.5, 3300), (1.953, -21, 5500), (2.0945, -23.5, 5200)]
    s, db, favoured_hz = np.transpose(strikes)
    out = np.zeros(N)
    for hz, mode_db in BOTTLE:
        level_db = db + mode_db - 17.5 * abs(np.log2(hz / favoured_hz))  # dB per octave off the favoured pitch
        out += ring(kicks(s, amp(level_db)), hz, width_hz=1.9 * hz / 1000)
    return out * (np.arange(N) / SR < SECOND_SHOT)


def blows():
    """Glass collapses in a lumpy noise burst that holds, then stops; the slab thuds and a dull rumble lingers."""
    # spectra of the crunch and the rumble: (frequency [Hz], relative level [dB])
    crunch_colour = [(40, -35), (120, 5.5), (500, 0.5), (1500, -1.5), (3800, -4), (6000, -39.5)]
    rumble_colour = [(50, -36), (130, 1.5), (310, -0.5), (450, -11), (900, -40.5)]
    body, treble, t = np.zeros(N), np.zeros(N), np.arange(SR // 3) / SR
    for s, db, length_s, treble_db, _ in BLOWS:
        shape = amp(db) * np.exp(-(t / length_s) ** 4)
        i = round(s * SR)
        body[i:i + len(t)] += shape[:N - i]
        treble[i:i + len(t)] += amp(treble_db) * shape[:N - i]
    s, db, _, _, thud_db = np.transpose(BLOWS)
    thud = ring(kicks(s + 0.0043, amp(db + thud_db)), hz=111, width_hz=51)
    rumble = fall(kicks(s, amp(db + thud_db - 33.5)), seconds=0.096) * noise(rumble_colour)
    lumps = amp(4 * wobble(300) + 3 * wobble(70))
    return body * lumps * noise(crunch_colour) + treble * noise(TICK) + thud + rumble


def scene():
    """All glass sounds over the air, rush and whine, alike in both channels."""
    glass = blows() + whole_bottle() + clinks() + rings() + rattle() + crumbs()
    glass = glass + scraping() + cavity() + rocking(count=7) + ticks()
    mono = glass + air(glass) + rush() + whine()
    return np.array([mono, mono])


def edit():
    """Gain of the cut: the first shot fades out fast, the second fades in from near silence."""
    cut_s, fade_out_s, silence_db, fade_in_db_per_s = 3.108, .008, -45, 480
    t = np.arange(N) / SR - cut_s
    db = np.maximum(silence_db * t / fade_out_s, silence_db + fade_in_db_per_s * (t - fade_out_s))
    return amp(np.where(t < 0, 0, np.minimum(db, 0)))


def record(dry):
    """One microphone, thin in the bass and soft in the top, overloads; then the cut and a 16 kHz band limit."""
    def microphone(hz):
        return amp(-4.0) * (1j * hz / (50 + 1j * hz)) ** 2 / (1 + 1j * hz / 10000)

    coloured = filtered(dry, microphone)
    clipped = coloured / (1 + abs(coloured / .98) ** 6) ** (1 / 6)
    return filtered(clipped * edit(), lambda hz: hz < 16000)


dry = scene()
out = record(dry)
to_wav(out)
```